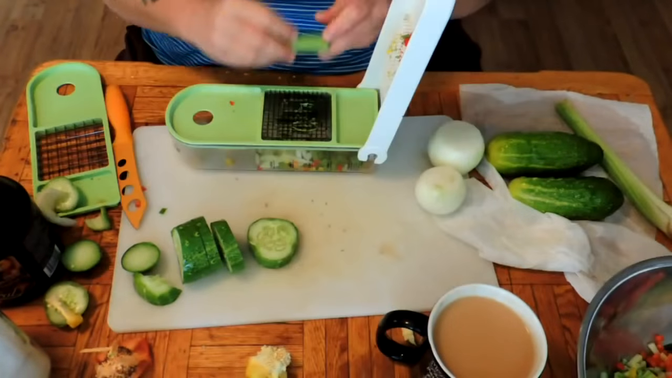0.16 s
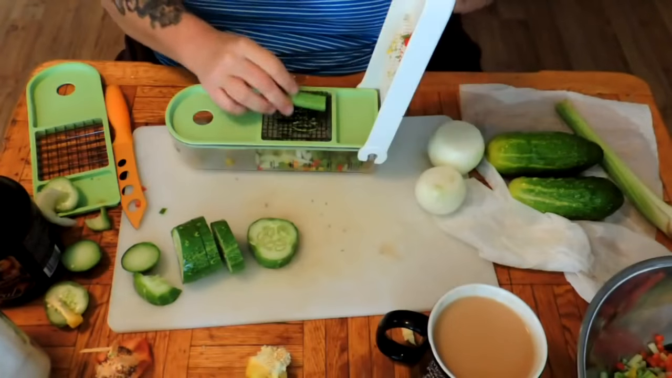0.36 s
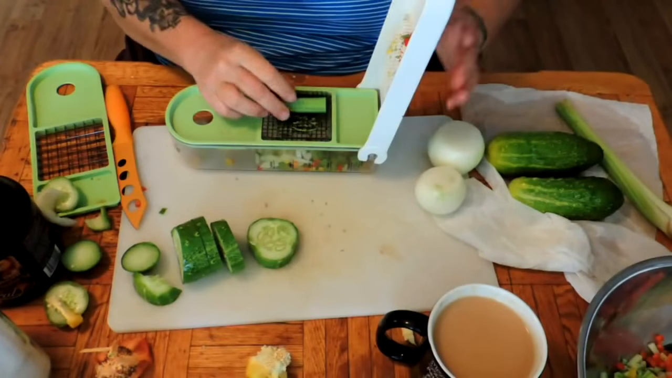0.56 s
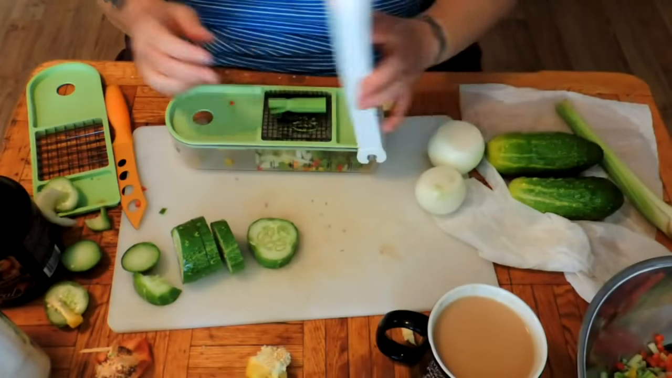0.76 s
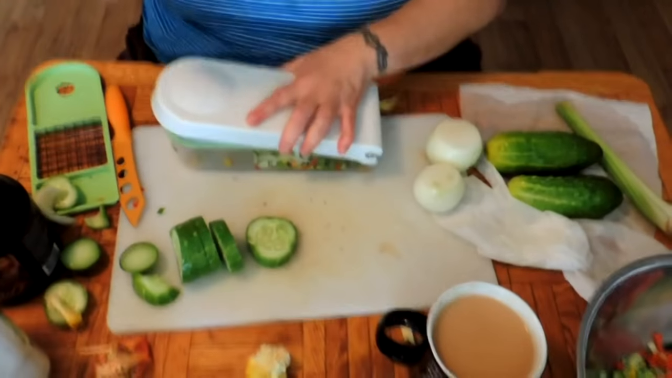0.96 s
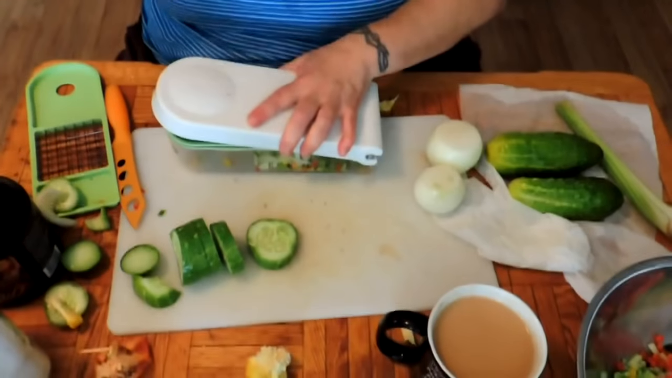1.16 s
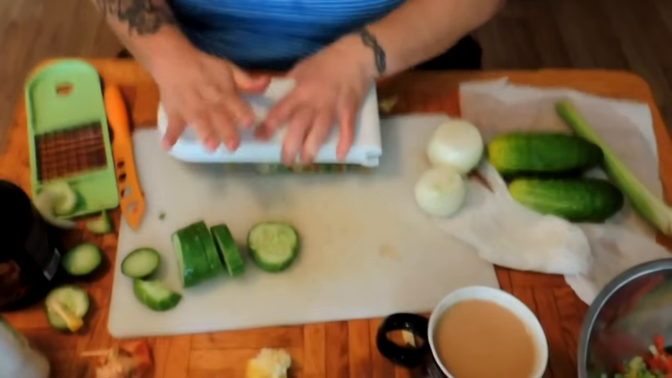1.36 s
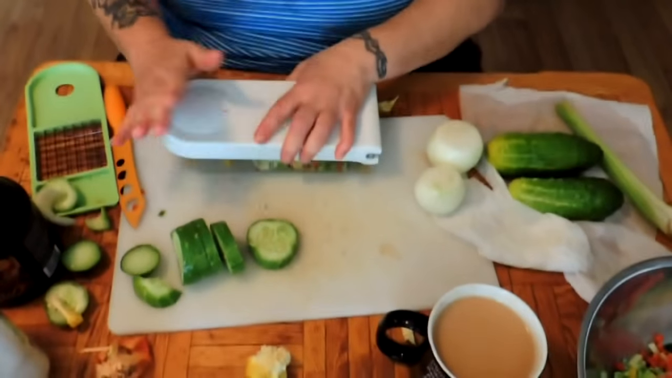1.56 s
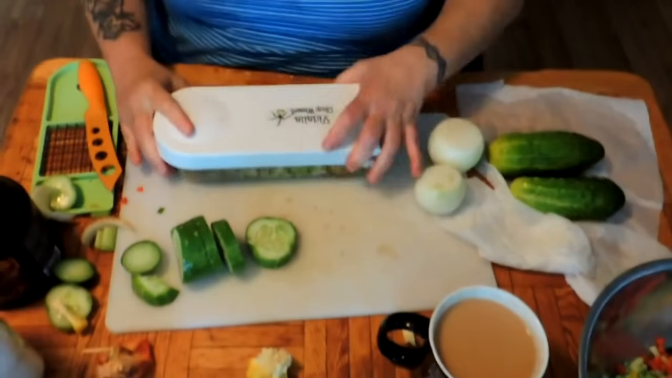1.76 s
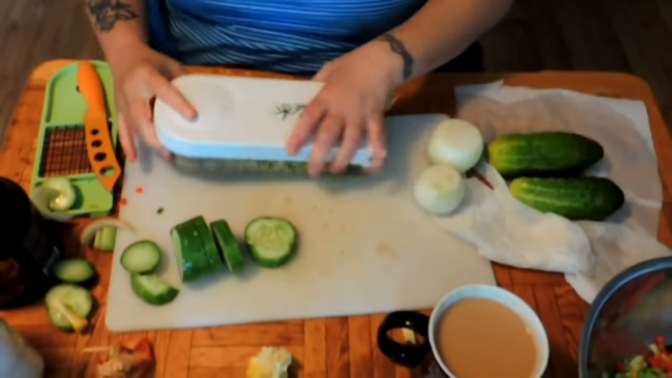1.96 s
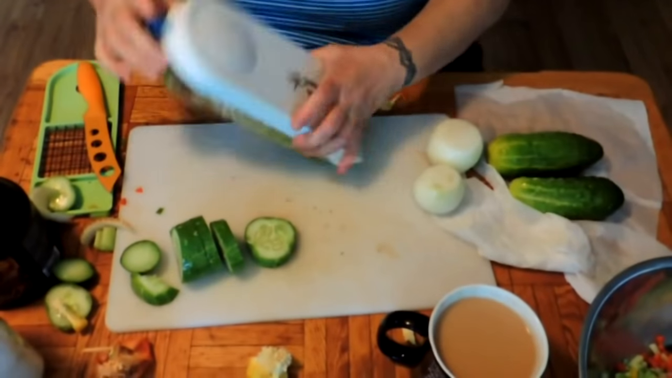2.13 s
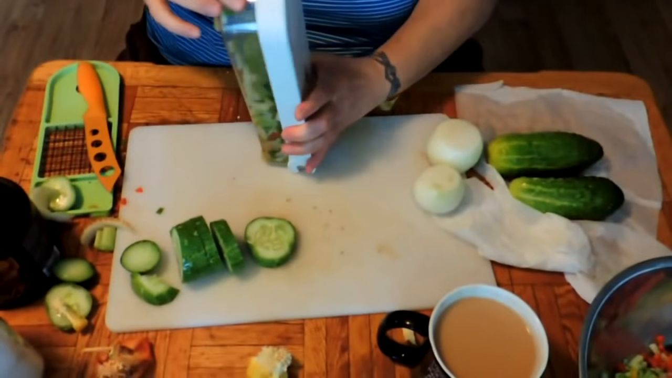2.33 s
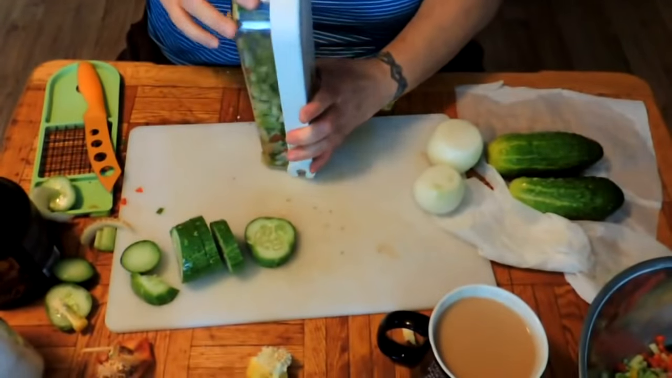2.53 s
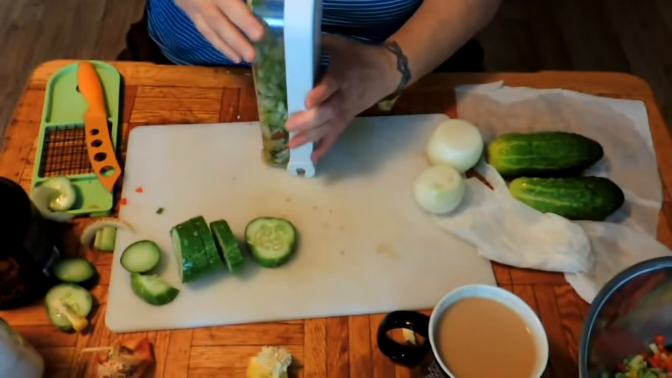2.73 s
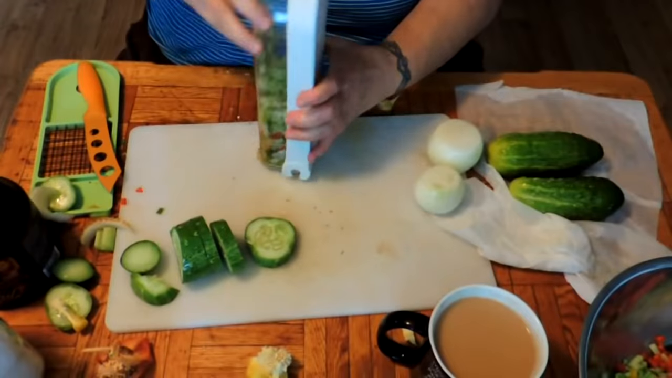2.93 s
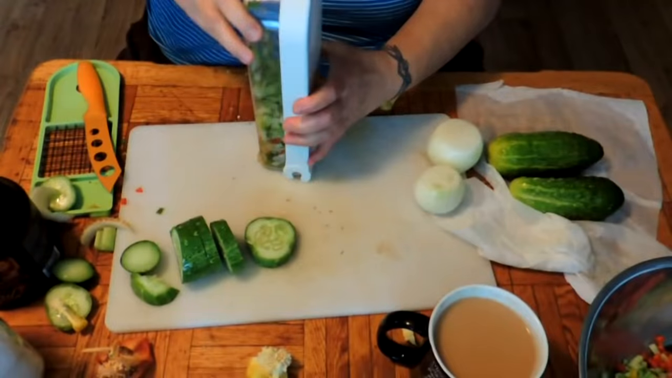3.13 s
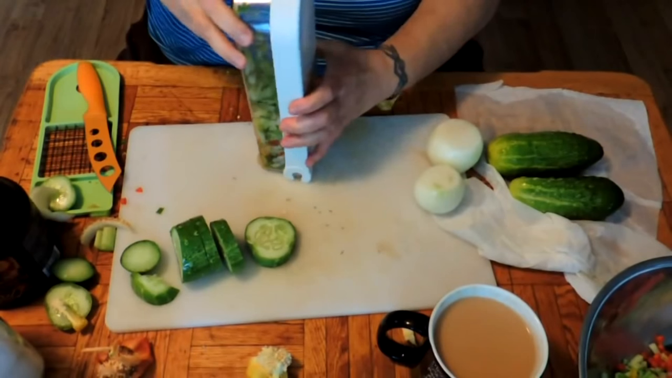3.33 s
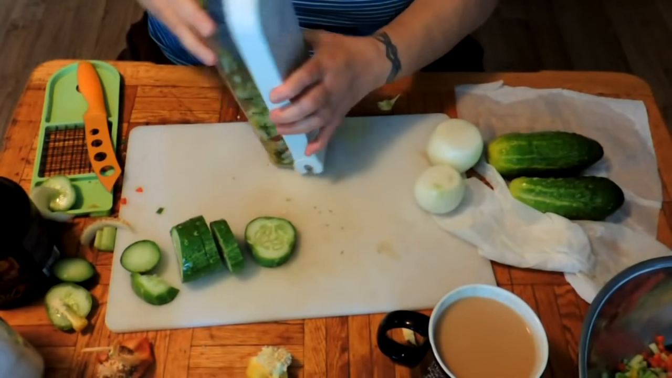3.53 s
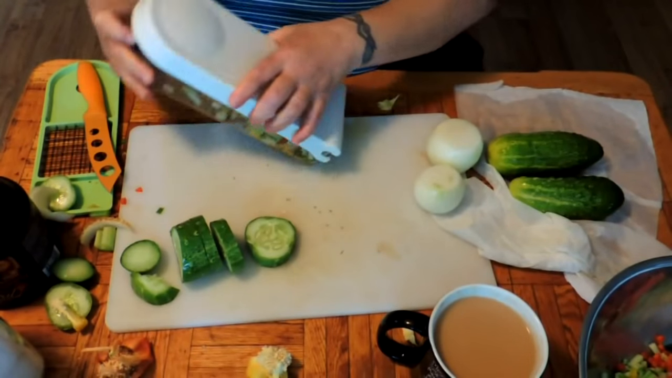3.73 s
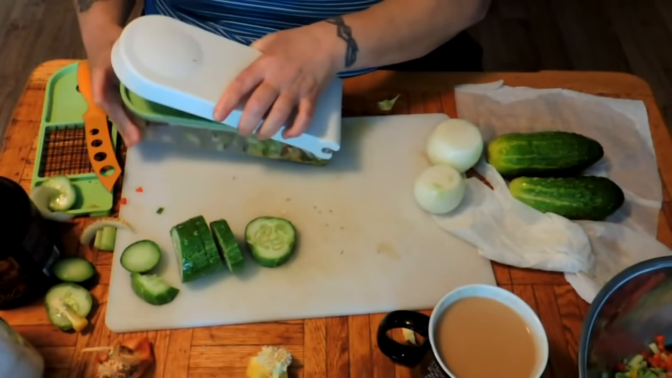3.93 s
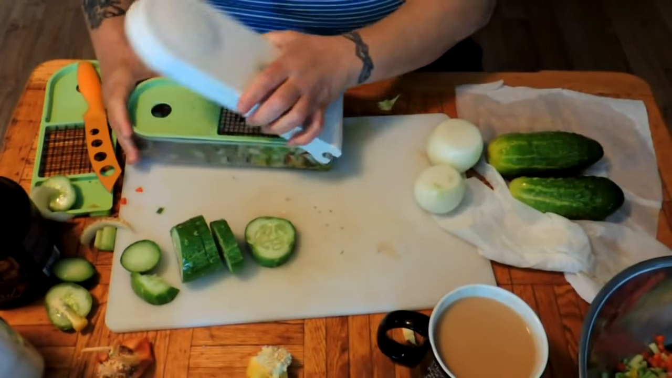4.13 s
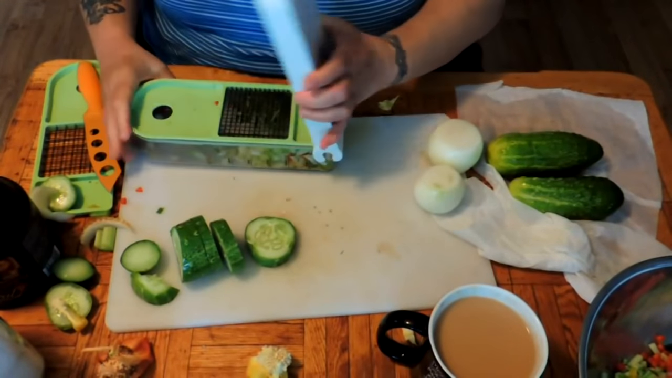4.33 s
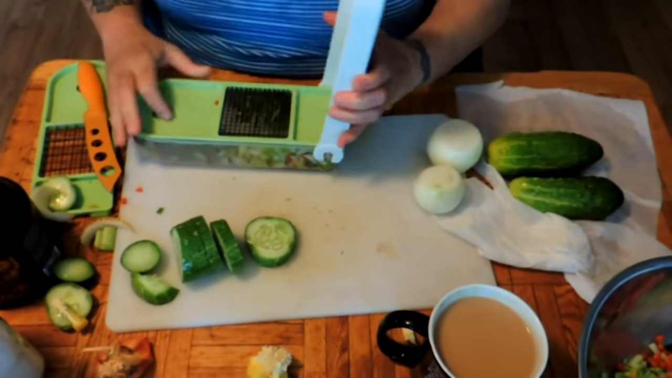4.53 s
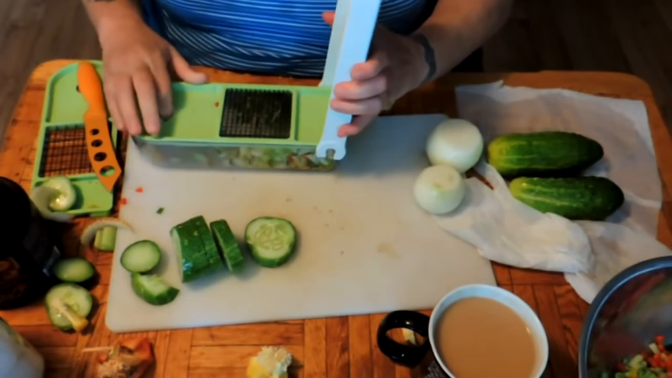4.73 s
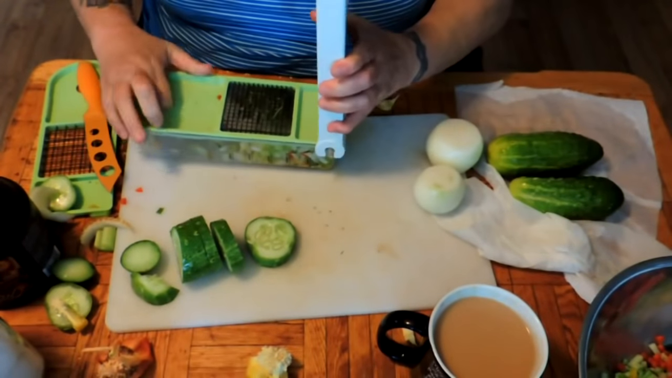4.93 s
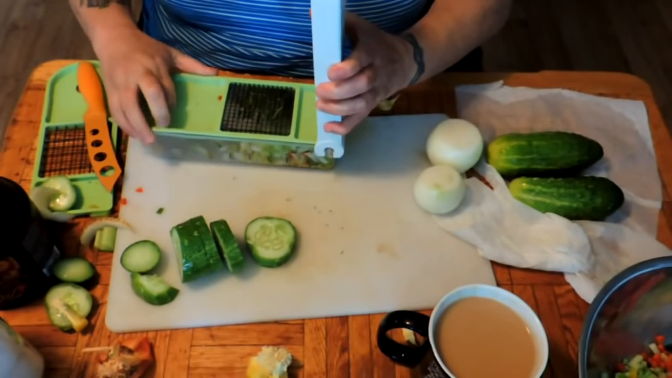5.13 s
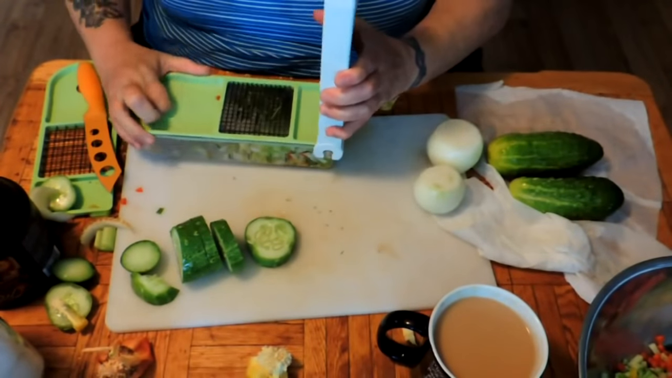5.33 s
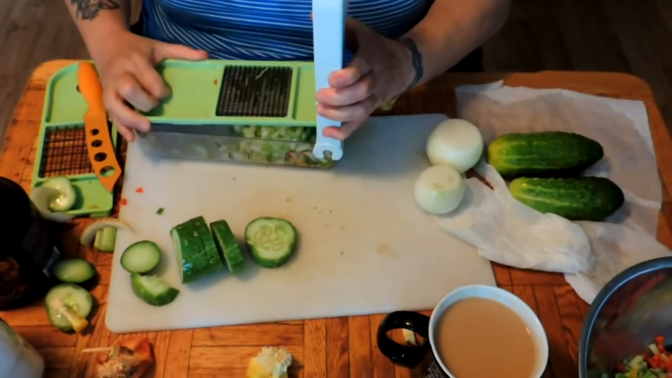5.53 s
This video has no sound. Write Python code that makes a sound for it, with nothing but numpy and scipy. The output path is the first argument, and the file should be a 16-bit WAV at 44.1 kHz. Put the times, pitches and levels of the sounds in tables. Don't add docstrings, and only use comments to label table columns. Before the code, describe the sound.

A soft appliance hum with airy hiss fades in at once, with low, lumpy air buffeting. From 0.8 to 1.0 s, light plastic ticks sound as the lid touches the grid. At about 1.05 s a sharp, crunchy clack cracks out. At 1.42 s comes the loudest slam, a dense cluster of bright cracks, hollow box thud and rattling plastic walls, overloaded, with a low table boom; a second, slightly shorter slam hits at 1.8 s. Both leave a brief room tail, and the hum sinks, then slowly recovers. Faint taps come at 2.1 and 2.4 s. Around 3.0-3.3 s small knocks surround a firmer box knock at 3.14 s. Tiny bright rustles of sliding pieces follow to 3.7 s, with a low air puff at 3.8 s. Quiet taps and finger clicks continue at 4.2, 4.8, 4.9, 5.13, 5.4 and 5.57 s, with puffs near 4.55 and 5.35 s.

```python
import sys
import numpy as np
from scipy import signal
from scipy.fft import rfft, irfft
from scipy.io import wavfile
from scipy.ndimage import uniform_filter1d

SR = 44100
rng = np.random.default_rng(int(sys.argv[2]) if len(sys.argv) > 2 else 0)


def store_pcm(level_fs):
    pcm = np.round(np.clip(level_fs, -1, 1) * 32767).astype(np.int16)
    wavfile.write(sys.argv[1], SR, np.atleast_2d(pcm).T)


def elevation(decibels):
    levels = np.asarray(decibels, float)
    return 10 ** (levels / 20)


N = 246152
T = np.arange(N) / SR
EDGES_HZ = 100 * 2 ** np.arange(0, 7.5, 0.3)


def rms_one(x):
    return x / np.sqrt(np.mean(x ** 2) + 1e-20)


def peak_one(x):
    return x / np.max(np.abs(x))


def at_hz(points, hz):
    points = np.array(points)
    return np.interp(np.log(hz), np.log(points[:, 0]), points[:, 1])


def coloured(x, spectrum):
    size = x.shape[-1]
    hz = np.arange(1, size // 2 + 2) * SR / size
    return irfft(rfft(x) * elevation(at_hz(spectrum, hz)), size)


def band_pass(x, low_hz, high_hz):
    return signal.sosfilt(signal.butter(2, [low_hz, high_hz], "band", fs=SR, output="sos"), x)


def ring(x, hz, t60):
    r, w = elevation(-60 / (t60 * SR)), 2 * np.pi * hz / SR
    return signal.lfilter([0, np.sin(w)], [1, -2 * r * np.cos(w), r * r], x)


def half_sine(x):
    return np.sin(np.pi * np.clip(x, 0, 1))


def drift(rate):
    r = np.exp(-80 * np.pi * rate / SR)
    white = rng.standard_normal(N // 40 + 2002)
    slow = signal.lfilter([1], [1, -2 * r, r * r], white)[2000:]
    return np.interp(np.arange(N) / 40, np.arange(len(slow)), rms_one(slow))


def add(out, sound, s, pan_db):
    i = round(s * SR)
    out[:, i:i + sound.shape[-1]] += sound[..., :max(N - i, 0)] * elevation([[pan_db / 2], [-pan_db / 2]])


def stereo_bands(size):
    # (f/Hz, correlation)
    likeness = [(100, 1), (300, 0.98), (640, 0.86), (1400, 0.42), (3000, 0.049), (4500, -0.24), (8000, 0.1),
                (15000, -0.14)]
    white = rng.standard_normal((2, 2, size))
    for k, (low, high) in enumerate(zip(EDGES_HZ, EDGES_HZ[1:])):
        mid, side = band_pass(white[k % 2], low, high)
        hz = np.sqrt(low * high)
        alike = np.clip(at_hz(likeness, hz), -1, 1)
        yield hz, np.sqrt(1 + alike) * mid + np.sqrt(1 - alike) * side * [[1], [-1]]


def touches():
    # (t/s, crack level/dB, hollow thud level/dB, thud f/Hz, wall clack level/dB)
    blows = [(1.0447, -21, -21.5, 480, -24), (1.0521, -14.5, -14.5, 2594, -13), (1.056, -3, -3, 497, -12.5),
             (1.066, -9.5, -10.5, 444, -30), (1.417, -1, -16.5, 410, -12), (1.4215, 1.5, 4.5, 285.6, -11.5),
             (1.4355, 9.5, -3, 236, -10.5), (1.446, 3, -5, 375, -7), (1.462, -10, -26, 377, -17.5),
             (1.794, 4, 0.5, 480, -4.5), (1.8074, -1, -1.5, 393, -8.5), (1.8187, -24, -8.5, 376.4, -12.5),
             (3.1331, -11.5, -11, 720, -10.5), (3.136, -5.5, -7.5, 480, -15),
             (3.1421, -40, -10.5, 272, -19), (3.154, -45, -16.5, 277, -32)]
    # (t/s, clack level/dB, thud level/dB, thud f/Hz, hardness/dB per octave)
    lid_taps = [(.809, -33, -59, 408, -3.5), (.846, -20, -17, 881, 0), (.867, -52.5, -21, 807, -5),
                (.96, -20.5, -25, 480, 1.5), (.966, -32.5, -21, 845, 3.5), (1.004, -27.5, -48, 800, -1),
                (1.049, -7.5, -19, 600, 12.5), (1.0639, -13.5, -18, 448, 11.5),
                (1.109, -44, -21, 463, -0.5)]
    box_taps = [(2.092, -45.5, -49, 2340, -3), (2.3975, -27, -20, 363, 3), (2.399, -40, -37, 2520, -5),
                (3.0003, -27.5, -28, 255, -5.5), (3.043, -28.5, -27, 480, 2.5),
                (3.056, -16, -22, 261, -2.5), (3.088, -32, -20.5, 368, -9), (3.2195, -22, -20.5, 292, 7.5),
                (3.2946, -31.5, -36, 270, -10), (3.73, -30, -31, 593, -5), (4.24, -41, -43, 506, -12),
                (4.79, -32.5, -43, 905, 6.5), (4.9368, -25.5, -28, 704, 1), (5.1259, -21.5, -22.5, 680, -3),
                (5.138, -42, -25, 400, -10), (5.151, -32, -30, 377, -10), (5.4065, -28, -30.5, 500, -3.5),
                (5.5595, -41, -49, 716, -3), (5.571, -27, -37, 720, -2.5)]
    # (crack/dB, thud/dB, clack/dB, hardness/dB per octave)
    blow_bounce = (-12.5, -5.5, -4.5, -7)
    tap_bounce = (-5.5, -10.5, -6.5, -6.5)
    # (level over clack/dB, more per hardness, bounce pitch ratio)
    lid_rule = (-6, 0.5, 1)
    box_rule = (-8.5, 0.27, 0.66)
    box_hz = 377

    # rows, delay of the bounce in s, change at the bounce, pitch ratio
    kinds = [([(*row, 4.5) for row in blows], 0.006, blow_bounce, 0.8)]
    for taps, (over_db, per_hardness, ratio) in ((lid_taps, lid_rule), (box_taps, box_rule)):
        rows = []
        for s, clack, thud, hz, hard in taps:
            rows.append((s, clack + over_db + per_hardness * hard, thud, hz, clack, hard))
        kinds.append((rows, 0.011, tap_bounce, ratio))
    for rows, delay_s, (crack, thud, clack, hard), ratio in kinds:
        for row in rows:
            yield row
            thud_hz = row[3]
            flatter = max(thud_hz * ratio, min(thud_hz, box_hz)) - thud_hz
            yield np.add(row, (delay_s, crack, thud, flatter, clack, hard))


def contacts():
    # (f/Hz, level/dB, t60/s)
    walls = [(480, 0.5, 0.22), (594, 4.5, 0.073), (720, 5.5, 0.11), (824, 8.5, 0.059), (923.5, 9.5, 0.095),
             (1027, 5.5, 0.049), (1176, 13, 0.021), (1395, 6, 0.059), (1546, 5.5, 0.042), (1756, 10, 0.024),
             (2050, 4, 0.028), (2270, -2.5, 0.04), (2474, -2, 0.039), (2764, -1.5, 0.03),
             (3130, -1.5, 0.017), (3565, -6.5, 0.031)]
    # (f/Hz, level/dB per Hz)
    crack_colour = [(880, -15), (1500, -4.5), (1860, -19), (2460, -12.5), (4580, -8), (9120, -10),
                    (13200, -15), (14500, -33), (15300, -61.5)]
    t, out = T[:5120], np.zeros((2, N))
    no_rumble = signal.butter(4, 200, "high", fs=SR, output="sos")
    for s, crack_db, thud_db, thud_hz, clack_db, tilt_db in touches():
        white = rng.standard_normal((3, len(t)))
        hiss = np.array([rms_one(coloured(w, crack_colour)) for w in white])
        crack = (0.64 * hiss[0] + 0.62 * hiss[1:]) * (1 - np.exp(-t / 0.001)) * np.exp(-t / 0.0032)

        push = half_sine(t * thud_hz * 2.32)
        thud = ring(push, thud_hz, 0.08) + 0.5 * ring(push, thud_hz * 1.243, 0.044)
        thud = peak_one(signal.sosfilt(no_rumble, thud))

        rattle = white[0] * np.exp(-t / 0.001) + 3.13 * (t == 0)
        clack = 0
        for k, (hz, db, t60) in enumerate(walls):
            level = elevation(db + tilt_db * np.log2(hz / 1000))
            clack = clack + level * ring(rattle, hz, t60) * (-1) ** k
        clack = peak_one(clack)

        sound = elevation(crack_db) * crack + elevation(thud_db + 4.5) * thud + elevation(clack_db + 6) * clack
        add(out, sound, s, -2.1)
    return out


def rustles():
    # (t/s, level/dB, length/s, centre f/Hz)
    slides = [(2.952, -49, 0.094, 9700), (3.379, -35, 0.011, 8070), (3.571, -47.5, 0.097, 9000),
              (3.635, -38, 0.013, 7960), (3.694, -49.5, 0.069, 8700), (3.689, -40, 0.047, 1030),
              (4.672, -39.5, 0.01, 7000), (4.697, -41.5, 0.013, 7540), (4.788, -34.5, 0.0057, 8200),
              (5.558, -43, 0.0094, 6000), (5.31, -55, 0.09, 7000)]
    out, t = np.zeros((2, N)), T[:4410]
    for s, level_db, length, hz in slides:
        clumps = elevation(8.8 * rng.standard_normal(len(t)))
        grains = rng.standard_normal((2, len(t))) * clumps
        band = rms_one(band_pass(grains, hz * 0.42, min(hz * 1.36, 18000)))
        swell = np.sqrt(half_sine(t / length).clip(0))
        add(out, elevation(level_db) * band * swell, s, -1.5)
    return out


def booms():
    # (t/s, peak level/dB, f/Hz, t60/s)
    table_modes = [
        (1.42, -8, 148.7, .25),
        (1.436, -15.5, 88.6, 0.14),
        (1.796, -22, 117.6, 0.12),
        (3.137, -40, 153, .07),
        (5.127, -34, 145, 0.14),
    ]
    out, t = np.zeros((2, N)), T[:8192]
    for s, peak_db, hz, t60 in table_modes:
        push = half_sine(t * hz * 2)
        add(out, elevation(peak_db) * peak_one(ring(push, hz, t60)), s, -1.2)
    return out


def kitchen(x):
    # (f/Hz, t60/s)
    room_t60 = [(150, 0.28), (700, 0.32), (2000, 0.33), (5000, 0.32), (13000, 0.25)]
    # (f/Hz, level/dB)
    room_colour = [(100, -9), (250, -7), (450, -10), (900, -3), (1600, -0.5), (4000, -1), (14000, 3)]
    out, fill = 0, np.exp(-1 / (0.00043 * SR))
    for (hz, band), low, high in zip(stereo_bands(size=N), EDGES_HZ, EDGES_HZ[1:]):
        given = band_pass(x + 1e-9, low, high) ** 2
        keep = elevation(-120 / (at_hz(room_t60, hz) * SR))
        stored = signal.lfilter([(1 - keep) * (1 - fill)], np.convolve([1, -keep], [1, -fill]), given)
        out = out + elevation(at_hz(room_colour, hz)) * np.sqrt(stored.clip(0)) * rms_one(band)
    return out


def background():
    # (f/Hz, level/dB per Hz)
    air_colour = [(71, -26), (120, -8), (199, -21.5), (299, 5.5), (331, -20.5), (359, -4), (389, -11.5),
                  (457, -12), (729, -10), (1260, -19), (1540, -18.5), (2410, -24), (12500, -33.5),
                  (14400, -35), (15300, -90)]
    # (f/Hz, width/Hz, level/dB)
    whine = [
        (1480, 73, -47),
        (9800, 340, 1),
        (12100, 330, 5),
    ]
    # (f/Hz, rms level/dB)
    hum = [(59.5, -50.5), (120, -55.5), (242.2, -47.5), (306.8, -51.5), (360.7, -42.5), (748.3, -51.5),
           (1082, -60), (1497, -55), (1550, -58.5), (1610, -62)]
    together = drift(0.63)
    air = 0
    for hz, band in stereo_bands(size=N):
        air = air + elevation(at_hz(air_colour, hz) + 0.56 * together + 1.05 * drift(6.0)) * band
    plain = air
    for hz, width, db in whine:
        air = air + elevation(db - 6.5) * signal.lfilter(*signal.iirpeak(hz, hz / width, SR), plain)
    lines = 0
    for k, (hz, db) in enumerate(hum):
        phase = 2 * np.pi * hz * T + 0.99 * drift(4.1) + k
        lines = lines + elevation(db + 3.5 + 2.0 * drift(4.5)) * np.sin(phase)
    return (elevation(-38) * rms_one(air) + lines) * elevation([[-0.8], [0.8]])


def draught(shake, sink_db):
    # (t/s, level/dB, half width/s, left-right/dB)
    gusts = [(.28, -47, 0.041, -6), (.4, -39, 0.054, -20), (.51, -38.5, 0.052, -3), (.68, -57, 0.12, -8),
             (.9, -44, 0.027, -17), (1.2, -67, 0.053, 0), (1.46, -24.5, 0.064, -1), (2.1, -41.5, 0.021, -9),
             (2.298, -45.5, .03, 14.5), (2.59, -46, .06, -1), (2.8, -51, .05, 10), (3.04, -39, 0.056, -8),
             (3.22, -51, 0.034, -16), (3.37, -48, 0.084, -9), (3.68, -48, 0.28, -5),
             (3.81, -40.5, 0.065, -8), (3.99, -46, .05, -3), (4.18, -41, 0.046, 7),
             (4.31, -40.5, 0.058, -10), (4.4, -42.5, .035, -14), (4.57, -34, 0.016, -8),
             (5.2, -46, 0.042, 19), (5.38, -36, 0.034, -6)]
    lumps = rng.standard_normal((3, N)) * elevation([2.2 * drift(20.0) for port in range(3)])
    low = band_pass(lumps[:2] + 0.5 * lumps[2], 16, 120)
    sides = np.array([[0.5], [-0.5]])
    wander_db, swing_db = 2.5 * drift(10.5), 4.5 * drift(6.0)
    steady = elevation(-49 + 0.12 * sink_db + wander_db + sides * (swing_db - 2.5))
    swells = 0
    for s, db, width, pan_db in gusts:
        swells = swells + elevation(db + 1.0 + sides * pan_db) * np.exp(-((T - s) / width) ** 2)
    return rms_one(low) * (steady + swells + elevation(-30.5) * shake)


def puffs():
    # (t/s, peak level/dB, length/s, left-right/dB)
    single_gusts = [(0.892, -38, 0.023, -11), (1.357, -33, 0.0068, -25), (3.789, -21.5, 0.0068, 9),
                    (4.30, -47, 0.0074, -5), (4.554, -27, 0.0094, -19), (5.348, -24, 0.011, 1)]
    out = np.zeros((2, N))
    for s, peak_db, length, pan_db in single_gusts:
        u = (T[:2048] / length - 0.6) * 2.7
        add(out, -elevation(peak_db) * (1 - u ** 2) * np.exp(-u ** 2 / 2), s, pan_db)
    return out


def lagged_power(x, lag_s):
    r = np.exp(-1 / (lag_s * SR))
    power = np.tanh(x.mean(axis=0)) ** 2
    return signal.lfilter([(1 - r) ** 2], [1, -2 * r, r * r], power).clip(0)


def gain_sink(box):
    sink_db = -19 * (lagged_power(box, 0.34) / 0.03) ** 1.4
    return sink_db - 15.5 * (T < 0.0415)


def scene():
    box = contacts() + rustles()
    room = kitchen(box.mean(axis=0)) * elevation([[-2.2], [-0.9]])
    sink_db = gain_sink(box)
    shake = np.sqrt(lagged_power(box, 0.027))
    air = draught(shake, sink_db) + puffs()
    return box + room + booms() + elevation(sink_db) * background() + air


def band_limit(x):
    return signal.sosfilt(signal.butter(12, 15410, fs=SR, output="sos"), x)


def record(dry):
    # (from t/s, to t/s, level/dB)
    ducks = [
        (1.405, 1.4126, -11.5),
        (1.776, 1.7938, -24.5),
    ]
    duck_db = sum(db * ((T > a) & (T < b)) for a, b, db in ducks)
    duck_db = uniform_filter1d(duck_db, size=60)
    loud = np.tanh(dry * elevation(duck_db) / 1.095)
    cut = signal.sosfilt(signal.cheby2(10, 40, 14660, fs=SR, output="sos"), loud)
    return band_limit(np.clip(1.04 * cut, -1, 1))


dry = scene()
out = record(dry)
store_pcm(out)
```